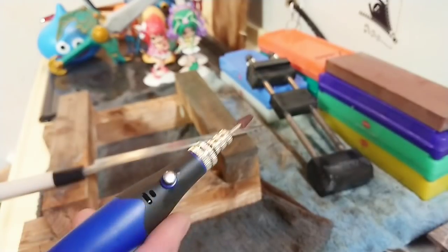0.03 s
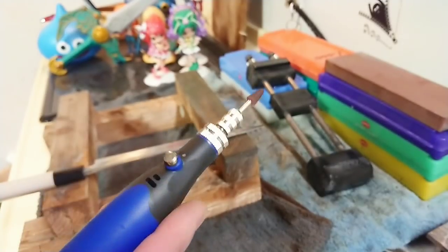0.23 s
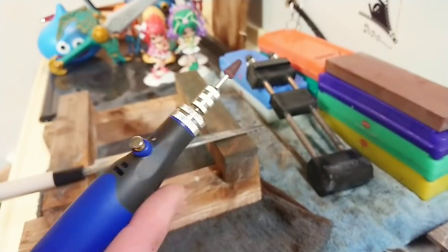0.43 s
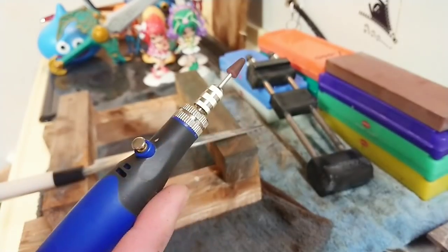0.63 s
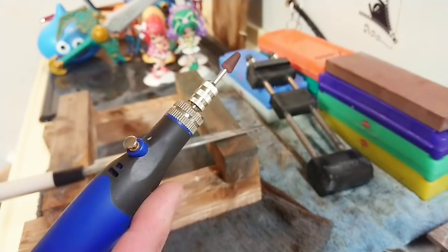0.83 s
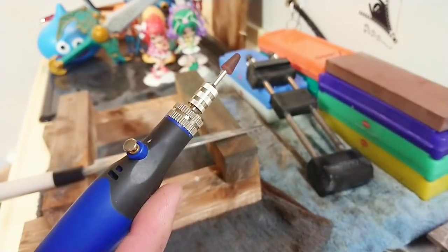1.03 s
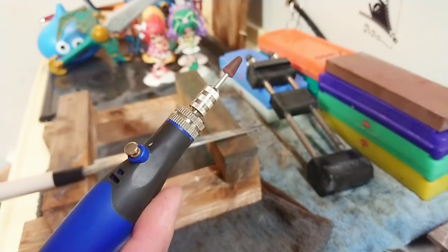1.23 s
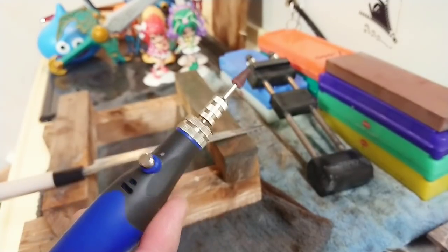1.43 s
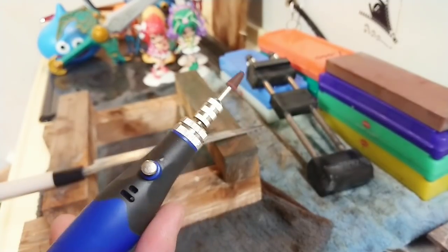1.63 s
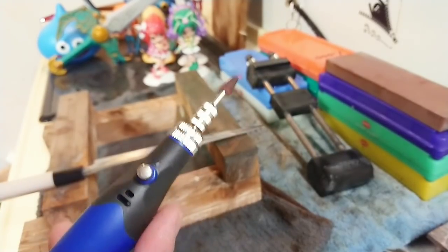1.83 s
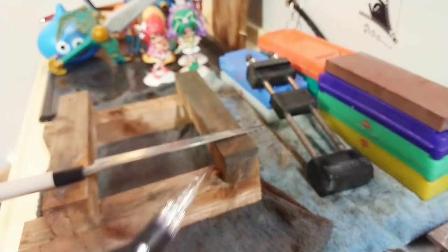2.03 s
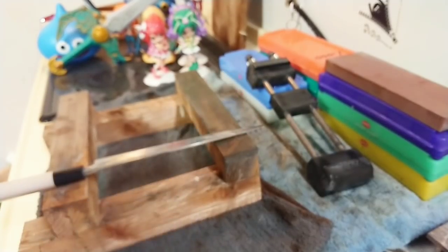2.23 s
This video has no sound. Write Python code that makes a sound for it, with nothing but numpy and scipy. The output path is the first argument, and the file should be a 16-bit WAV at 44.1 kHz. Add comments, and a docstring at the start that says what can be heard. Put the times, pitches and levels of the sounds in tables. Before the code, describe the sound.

A small cordless rotary tool starts with a button click at about 0.2 seconds, close by in a quiet workshop. It quickly reaches a steady high whine with a fine bearing rattle and dry hiss. From 1.3 seconds the pitch falls as it winds down, with a sharper button click near 1.65 seconds. The rubbing hiss dulls and fades, with a faint thin squeal around 2.15 seconds.

```python
"""Over faint noise and a low hum, a button clicks and fingers brush a small cordless rotary tool.
Held close over a workbench, the tool spins up to a steady whine with a dry rubbing hiss.
Its ball bearing rattles in a pattern that repeats with the shaft and with the slower ball cage.
The power is cut; a low hum swells and the button snaps back while the shaft coasts down under friction.
The hiss dulls, and the bearing squeals faintly just before rest."""
import sys
import numpy as np
from scipy import signal
from scipy.fft import rfft, irfft, next_fast_len
from scipy.io import wavfile
from scipy.ndimage import map_coordinates

SR = 44100
rng = np.random.default_rng(int(sys.argv[2]) if len(sys.argv) > 2 else 0)


def dump(signal):
    """Clip the signal to [-1, 1] and save it as 16-bit WAV at the path in sys.argv[1]."""
    limited = np.clip(np.atleast_2d(signal).T, -1, 1)
    pcm = np.round(limited * 32767).astype(np.int16)
    wavfile.write(sys.argv[1], SR, pcm)


N = 101429

# Background noise. Each row: frequency in Hz, gain in dB.
FLOOR_SPECTRUM = [(25, -28), (70, -9), (160, -18), (450, -23), (1100, -22.5), (1900, -28.5), (6000, -35.5),
                  (10000, -28), (15000, -77)]
# Low hum. Each row: time in seconds, relative level in dB.
HUM_LEVELS = [(.05, -81), (.7, -81), (1.0, -68.5), (1.25, -78), (1.38, -82), (1.5, -79), (1.6, -90)]
# Button snaps. Each row: time in seconds, then relative level, slide, treble tilt and spring, all in dB.
BUTTON_SNAPS = [(.114,-61.5,-37,-34,-20),(.2258,-23.5,-14,1,-12),(1.6523,-16,-11,-4,-41),(1.878,-47,-20,14,-25)]
# Click colour. Each row: frequency in Hz, gain in dB.
BUTTON_SPECTRUM = [(300, -36), (900, -42), (1800, -26.5), (2250, -25), (2700, -14.5), (3300, -9),
                   (3800, -15), (4150, -18), (4750, -4), (6300, -5), (7200, -0.5), (8300, -11),
                   (10700, -6.5), (12300, -18), (14400, -9.5), (15800, -19.5)]
# Button spring. Each entry: mode frequency in Hz.
SPRING_MODES_HZ = [4400,4900,5330]
# Band-noise swells. Each row: peak time and half-width in seconds, centre in Hz, relative level in dB.
SOFT_SWELLS = [(0.153, 0.046, 2970, -76), (0.18, 0.11, 7600, -74), (.24, 0.037, 66, -65.5),
               (1.41, 0.14, 48.3, -71), (1.59, 0.096, 290, -70.5), (1.893, 0.025, 435, -61.5),
               (2.082, 0.079, 80, -76), (2.18, 0.34, 418, -72)]
# Bearing rattle. Each row: time in seconds, relative level in dB.
RATTLE_LEVELS = [(.22, -59), (.26, -54.5), (.33, -44.5), (.45, -44.5), (.65, -43), (1.1, -43.5),
                 (1.45, -44), (1.55, -48), (1.63, -58), (1.8, -65.5), (2.0, -77), (2.3, -101)]
# Housing response. Each row: frequency in Hz, gain in dB.
HOUSING_SPECTRUM = [(150,-30),(300,-39),(390,-17),(480,-39),(860,-35.5),(1080,-13),(1330,-8),(1950,-0.5),(2250,-9),(2850,-1),(3200,-8.5),(3450,-2),(4350,-6),(5800,-1.5),(7200,-4.5),(7900,-14),(10500,-9.5),(12200,-15),(15700,-10)]
# Narrow housing resonances. Each row: centre in Hz, width in Hz, lift in dB.
HOUSING_MODES = [(3050, 60, 4), (3430, 110, 4), (3840, 70, 3), (7010, 100, 3), (9050, 100, 4),
                 (10500, 130, 6), (13800, 90, 5), (14400, 150, 7)]
# Rubbing of bearing and brushes. Each row: time in seconds, relative level in dB.
RUB_LEVELS = [(.23, -59), (.3, -52.5), (1.3, -51.5), (1.7, -50.5), (1.85, -55), (2.0, -60), (2.13, -58.5),
              (2.3, -65)]
# Rubbing colour. Each row: frequency in Hz, gain in dB.
RUB_SPECTRUM = [(150, -19.5), (400, -10), (900, -6.5), (1500, -2.5), (1850, 7.5), (2300, -9), (2900, 1),
                (3450, 4.5), (4200, -1.5), (5500, -2), (6300, 3.5), (8500, -3.5), (10800, -2), (11900, -18),
                (13800, 0.5), (15800, -12.5)]
# Whine partials. Each row: multiple of the shaft rate, added multiple of the cage rate.
WHINE_ORDERS = [(1, 0), (2, 0), (3, 1), (4, 0), (5, 1), (7, 1), (8, 0), (8, 2), (9, 1), (10, -1), (10, 1),
                (10, 2), (15, 2), (18, 3), (6, 2), (7, 2), (16, 3), (18, 2), (21, 0), (25, 3), (10, 0)]
# Each entry: relative level of the matching partial in dB.
WHINE_LEVELS_DB = [-78,-85,-77,-69,-75,-69,-63,-62,-56,-63,-61,-60.5,-61,-59.5,-72,-67,-61.5,-62,-63.5,-64.5,-64.5]
# Whine level as the grip shifts. Each row: time in seconds, lift in dB.
GRIP_LIFT = [(.3, -5), (.7, -3), (1.0, 0), (1.3, 0), (1.5, 1), (1.7, -9)]
# Bearing squeal. Each row: time in seconds, pitch in Hz, relative level in dB.
SQUEAL_PATH = [(2.1, 8050, -91), (2.15, 7950, -68), (2.18, 7300, -89), (2.22, 7300, -97)]
# Loss at the far, right microphone. Each row: frequency in Hz, loss in dB.
FAR_LOSS = [(100, 8), (380, 18.5), (1300, 16.5), (2400, 10.5), (4400, 24), (8100, 9.5), (15000, 5.5)]
# Room decay. Each row: frequency in Hz, T60 in seconds.
ROOM_DECAY = [(200, .25), (3000, .2), (14000, .14)]

FLOOR_DB, HUM_HZ = -69, 58
SLIDE_S, SLIDE_RISE_DB = .0043, 11
SNAP_HOLD_S, SNAP_T60_S, SPRING_T60_S = .0013, .012, .04
SWELL_HALF_BAND_OCT = .68
ON_S, CUT_S, SPIN_UP_S = .227, 1.318, .05
RUN_HZ, SAG_HZ_PER_S, BRAKE_HZ_PER_S = 185.7, 2.1, 178
CAGE_RATIO = .1915  # cage turns per shaft turn
CAGE_SWING, SHAFT_SWING, LOAD_WANDER = .29, .18, .063
GRIT_ABOVE_HZ, FLUTTER_NOISE_SHARE, GRIT_NOISE_SHARE = 7550, .09, .53
DULL_DB, DULL_ABOVE_HZ, DULL_SHAFT_HZ = -30, 6400, 62
BENCH_DELAY_S, BENCH_DB = .008, -12.5
SCATTER_DECAY_S, SCATTER_DB, FAR_DELAY_S = .012, 3, .0002506
ROOM_DB, TOP_HZ = -19, 15900
TIME_S = np.arange(N) / SR


def amp(db):
    """Decibels to gain."""
    return 10 ** (np.asarray(db) / 20)


def unit(x):
    """Scale to rms 1."""
    return x / np.sqrt(np.mean(x ** 2) + 1e-20)


def along(points, hz):
    """Interpolate (Hz, value) points on a log axis."""
    knots_hz, values = np.transpose(points)
    return np.interp(np.log(hz + 1), np.log(knots_hz + 1), values)


def curves(rows):
    """One value per sample for each column after the time."""
    knots_s, *columns = np.transpose(rows)
    return [np.interp(TIME_S, knots_s, column) for column in columns]


def wobble(rate_hz):
    """Smooth random curve with knots at rate_hz."""
    return map_coordinates(rng.standard_normal(int(N * rate_hz / SR) + 4), [TIME_S * rate_hz])


def filtered(x, response):
    """Apply a frequency response."""
    size = next_fast_len(N + SR // 2)
    return irfft(rfft(x, size) * response(np.fft.rfftfreq(size, 1 / SR)), size)[..., :N]


def causal(gain):
    """Minimum-phase response with this gain."""
    cepstrum = irfft(np.log(gain + 1e-9))
    half = len(cepstrum) // 2
    cepstrum[1:half] *= 2
    cepstrum[half + 1:] = 0
    return np.exp(rfft(cepstrum))


def noise(spectrum):
    """Coloured noise of rms 1."""
    return unit(filtered(rng.standard_normal(N), lambda f: amp(along(spectrum, f))))


def background():
    """Steady noise and a wavering hum, both louder on the left."""
    floor = amp(FLOOR_DB) * np.array([noise(FLOOR_SPECTRUM), amp(-8) * noise(FLOOR_SPECTRUM)])
    hum = amp(curves(HUM_LEVELS)[0] + 4.3 * wobble(6)) * np.sin(2 * np.pi * HUM_HZ * TIME_S)
    return floor + hum * amp([[4], [-2]])


def button():
    """The latch slides, snaps home and rings its spring."""
    out = np.zeros(N)
    for snap_s, db, slide_db, treble_db, spring_db in BUTTON_SNAPS:
        t = TIME_S - snap_s
        after_s = np.maximum(t, 0)
        slide = amp(slide_db + SLIDE_RISE_DB * np.minimum(t, 0) / SLIDE_S) * (t > -SLIDE_S) * (t < 0)
        snap = amp(-60 * np.maximum(t - SNAP_HOLD_S, 0) / SNAP_T60_S) * (t >= 0)
        burst = np.sign(rng.standard_normal(N)) * (slide + snap)
        colour_db = lambda f: along(BUTTON_SPECTRUM, f) + treble_db * np.log2(1 + f / 5000)
        click = filtered(burst, lambda f: causal(unit(amp(colour_db(f)))))
        modes = sum(np.sin(2 * np.pi * hz * after_s) for hz in SPRING_MODES_HZ)
        spring = amp(spring_db - 60 * after_s / SPRING_T60_S) * modes
        out += amp(db) * (click + spring)
    return out


def soft_swells():
    """Soft swells of band noise: finger brushes, rustle and a low swell of hum."""
    out = np.zeros(N)
    for peak_s, half_width_s, hz, db in SOFT_SWELLS:
        bandpass = lambda f: 1 / (1 + (np.log2((f + 1) / hz) / SWELL_HALF_BAND_OCT) ** 4)
        band = unit(filtered(rng.standard_normal(N), bandpass))
        out += amp(db) * band * np.exp(-2 * ((TIME_S - peak_s) / half_width_s) ** 2)
    return out


def shaft_speed_hz():
    """Quick spin-up, slight sag, then steady braking by friction."""
    driven_s = np.clip(TIME_S, ON_S, CUT_S) - ON_S
    driven_hz = RUN_HZ * (1 - np.exp(-driven_s / SPIN_UP_S)) - SAG_HZ_PER_S * driven_s
    return np.maximum(driven_hz - BRAKE_HZ_PER_S * np.maximum(TIME_S - CUT_S, 0), 0)


def housing(f):
    """Housing response: a broad shape plus narrow resonances."""
    modes_db = sum(db / (1 + (2 * (f - hz) / width_hz) ** 2) for hz, width_hz, db in HOUSING_MODES)
    return causal(amp(along(HOUSING_SPECTRUM, f) + modes_db))


def rattle(turns):
    """Balls run over a rough track, pressing harder once per cage turn; the housing rings."""
    shaft_rad = 2 * np.pi * turns
    cage_rad = CAGE_RATIO * shaft_rad
    track = np.zeros(N)
    for cage_order in range(-2, 4):
        profile = np.fft.ifft(np.exp(2j * np.pi * rng.random(115)), 4096)  # roughness over one turn
        roughness = np.interp(turns, np.arange(len(profile)) / len(profile), profile, period=1)
        track += np.real(roughness * np.exp(1j * cage_order * cage_rad))
    force = lambda share: np.sqrt(1 - share) * unit(track) + np.sqrt(share) * rng.standard_normal(N)
    strokes = np.exp(SHAFT_SWING * sum(np.cos(k * shaft_rad) for k in range(1, 4)))
    load = np.exp(LOAD_WANDER * wobble(90) - CAGE_SWING * np.cos(cage_rad))
    low = lambda f: 1 / (1 + (f / GRIT_ABOVE_HZ) ** 8)
    flutter = force(FLUTTER_NOISE_SHARE) * strokes * load
    flutter = filtered(flutter, lambda f: housing(f) * np.sqrt(low(f)))
    grit = filtered(force(GRIT_NOISE_SHARE) * strokes, lambda f: housing(f) * np.sqrt(1 - low(f)))
    return amp(curves(RATTLE_LEVELS)[0]) * unit(flutter + grit)


def rub(speed_hz, turns):
    """Bearing and brushes slide: a grainy hiss, duller at low speed."""
    hiss = unit(noise(RUB_SPECTRUM) * amp(.44 * wobble(300) + .47 * np.cos(2 * np.pi * turns)))
    treble = filtered(hiss, lambda f: f ** 4 / (f ** 4 + DULL_ABOVE_HZ ** 4))
    slowness = np.clip(1 - speed_hz / DULL_SHAFT_HZ, 0, 1)
    hiss += treble * (amp(DULL_DB * slowness) - 1)
    return amp(curves(RUB_LEVELS)[0]) * hiss


def whine(speed_hz, turns):
    """Clean partials of shaft and cage; the high ones need full speed."""
    out = np.zeros(N)
    grip_db, = curves(GRIP_LIFT)
    for (shaft_order, cage_order), db in zip(WHINE_ORDERS, WHINE_LEVELS_DB):
        exponent = 1 if shaft_order < 6 else 5
        level = amp(db + grip_db + 2 * wobble(20)) * (speed_hz / RUN_HZ) ** exponent
        cycles = (shaft_order + cage_order * CAGE_RATIO) * turns + rng.random()
        out += np.sqrt(2) * level * np.sin(2 * np.pi * cycles)
    return out


def squeal():
    """The bearing gives a thin falling tone near rest."""
    hz, db = curves(SQUEAL_PATH)
    cycles = np.cumsum(hz + 40 * wobble(130)) / SR
    return amp(db) * np.sin(2 * np.pi * cycles) * (TIME_S > SQUEAL_PATH[0][0])


def far_microphone(x):
    """Direct sound plus reflections off bench clutter, later and a little stronger."""
    t = np.arange(SR // 20) / SR
    cluster = rng.standard_normal(len(t)) * np.exp(-t / SCATTER_DECAY_S)
    early = amp(SCATTER_DB) * signal.fftconvolve(x, cluster / np.linalg.norm(cluster))[:N]
    mix = (x + early) / np.hypot(1, amp(SCATTER_DB))
    return filtered(mix, lambda f: amp(-along(FAR_LOSS, f)) * np.exp(-2j * np.pi * f * FAR_DELAY_S))


def room(x):
    """Short diffuse tail, different at each microphone."""
    hz, t, spectra = signal.stft(rng.standard_normal((2, SR // 2)), SR, nperseg=256)
    decay = amp(-60 * t / along(ROOM_DECAY, hz)[:, None])
    tail = signal.istft(spectra * decay, SR, nperseg=256)[1]
    return signal.fftconvolve(x[None], tail / np.linalg.norm(tail[0]), axes=1)[:, :N]


def scene():
    """The tool is close to the left microphone; bench and room reflect."""
    speed_hz = shaft_speed_hz()
    turns = np.cumsum(speed_hz * (1 + .00064 * wobble(25.38))) / SR
    motor = (whine(speed_hz, turns) + rattle(turns) + rub(speed_hz, turns) + squeal()) * (speed_hz > 0)
    swells = soft_swells()
    clicks = button()
    bench_echo = filtered(clicks, lambda f: amp(BENCH_DB) * np.exp(-2j * np.pi * f * BENCH_DELAY_S))
    near = 2 * (motor + swells + clicks + bench_echo)
    return np.array([near, far_microphone(near)]) + background() + amp(ROOM_DB) * room(near)


def record(dry):
    """Steep low-pass at the band limit."""
    return filtered(dry, lambda f: 1 / (1 + (f / TOP_HZ) ** 120))


dry = scene()
out = record(dry)
dump(out)
```